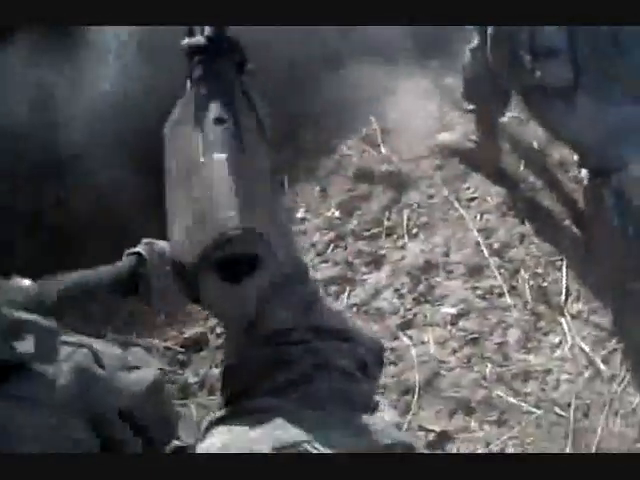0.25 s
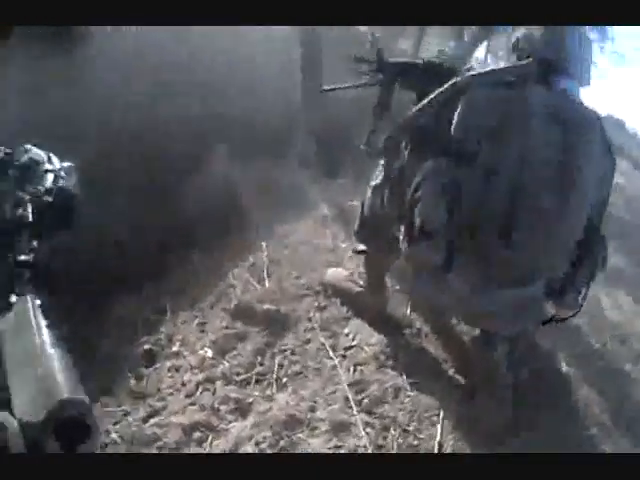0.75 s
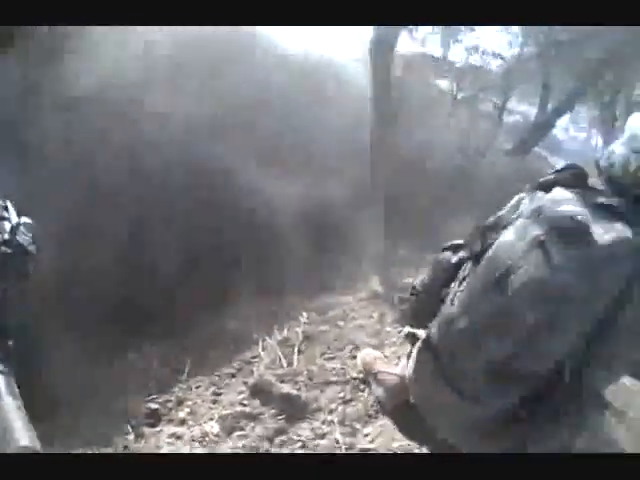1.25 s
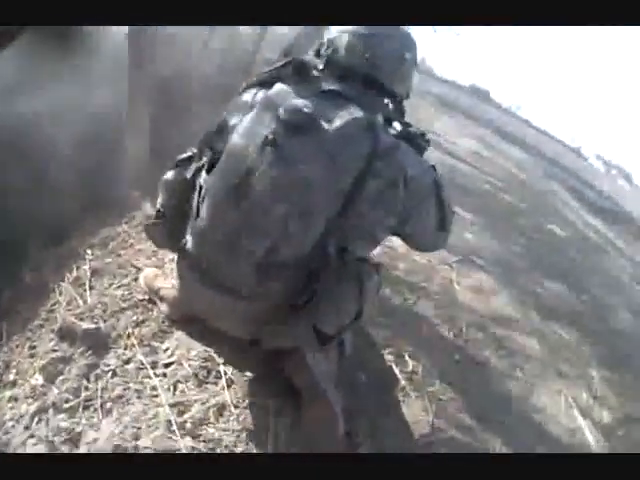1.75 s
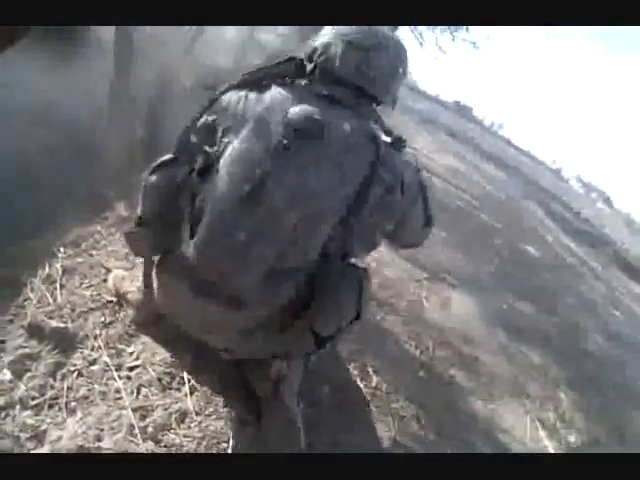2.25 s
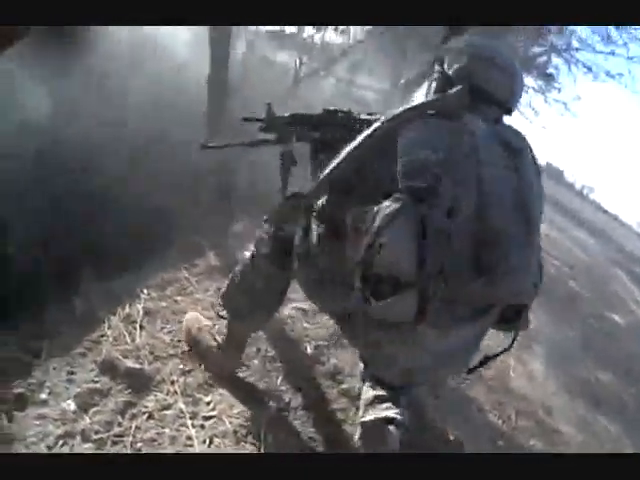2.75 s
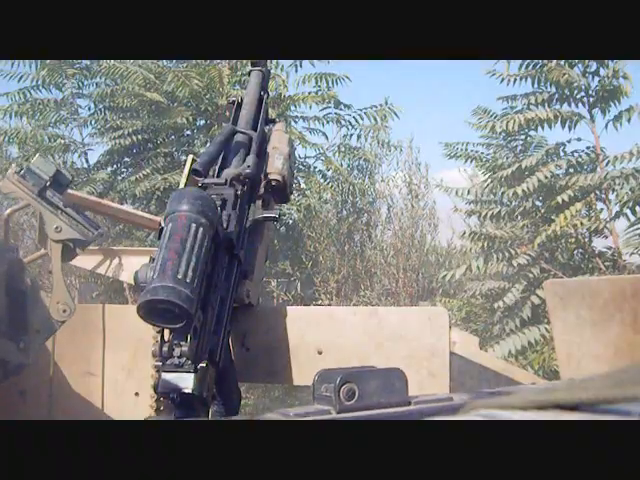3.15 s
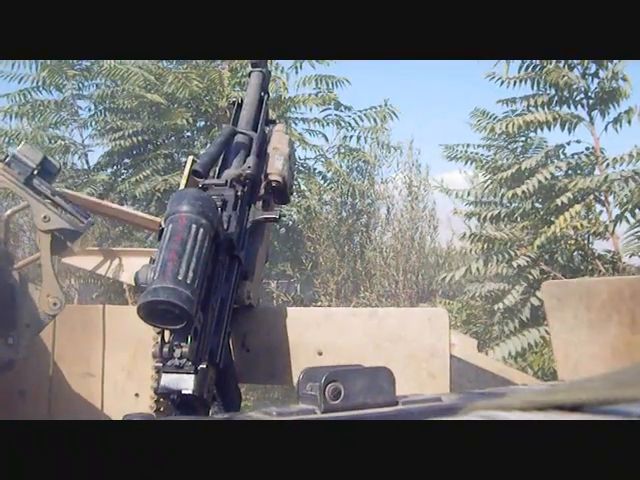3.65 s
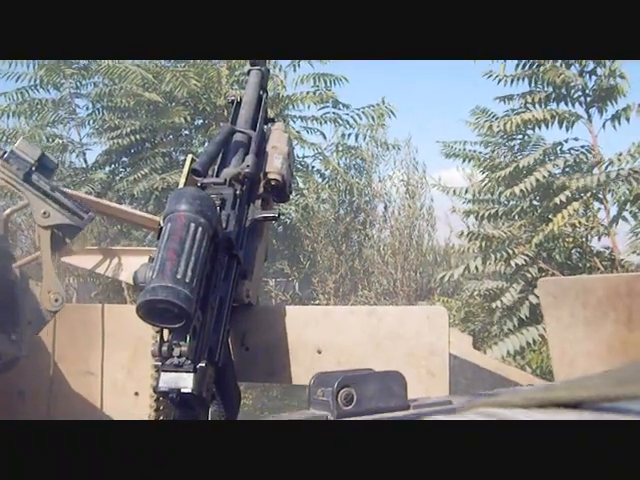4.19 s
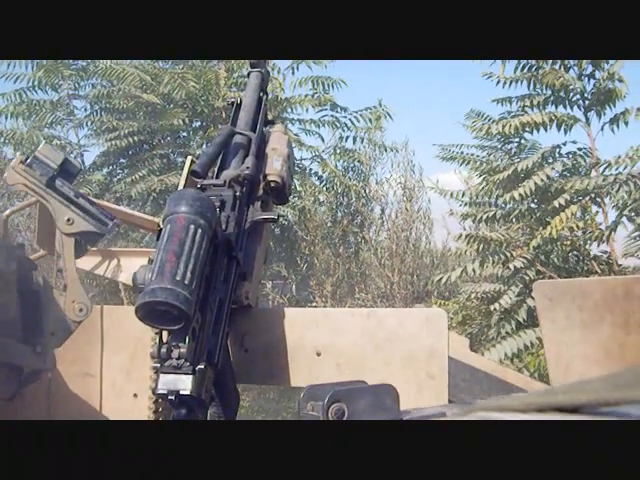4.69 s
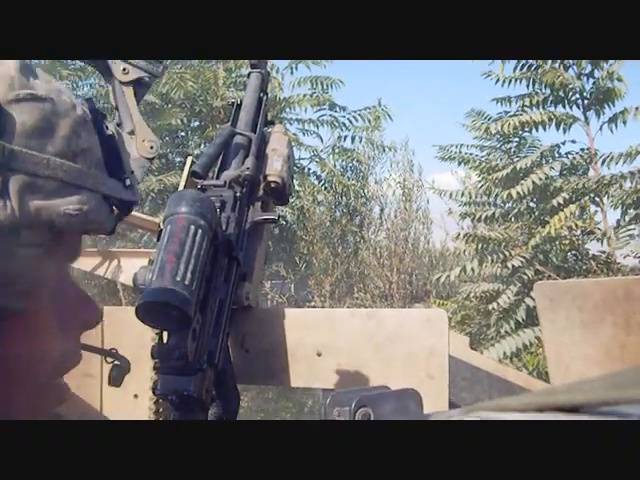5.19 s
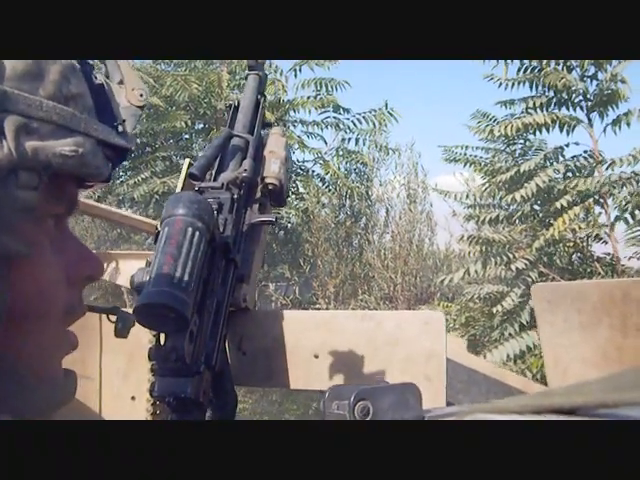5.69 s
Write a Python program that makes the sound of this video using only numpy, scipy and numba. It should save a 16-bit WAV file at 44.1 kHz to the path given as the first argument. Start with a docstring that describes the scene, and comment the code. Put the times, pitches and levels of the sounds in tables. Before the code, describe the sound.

Overloaded gunfire in a field, sharp cracks and a short light machine-gun burst, then ringing rifle shots and a heavy gun's twelve-round string.

```python
"""A light machine gun fires beside a body camera in a field, its blasts and pressure swings driving the
microphone against the rails, amid rifle cracks made of blast waves and far low knocks. Then, at a
vehicle's turret: single rifle shots that ring the armour and a twelve-round burst of the mounted heavy
gun, made of shaped noise and a sinking roar, heard through a dull, overloaded recorder."""
import sys
import numpy as np
from scipy import signal
from scipy.fft import rfft, irfft
from scipy.io import wavfile
from scipy.ndimage import uniform_filter1d
from numba import njit

SR = 44100
rng = np.random.default_rng(int(sys.argv[2]) if len(sys.argv) > 2 else 0)


def inscribe(sig):
    """Save sig as 16-bit PCM at rate SR to the path in sys.argv[1].

    A 1-D sig is mono; a 2-D sig holds one channel per row.
    Samples are clipped to [-1, 1] before scaling.
    """
    pcm = np.round(np.clip(np.atleast_2d(sig).T, -1, 1) * 32767)
    wavfile.write(sys.argv[1], SR, pcm.astype(np.int16))


N = 261513
T = np.arange(int(1.5 * SR)) / SR  # time axis of one sound [s]
FIELD_END_S = 2.91
FIELD_TOP_HZ, TURRET_TOP_HZ, TOP_HZ = 8500, 3930, 15700

# light gun and rifle blast spectrum: (frequency [Hz], relative density [dB])
LIGHT_BLAST_SPECTRUM = [(60, -18), (250, 1.5), (600, -2), (1200, -4.5), (2500, -7), (4200, -2), (6000, 1),
                        (8000, -4.5), (15000, -14.5)]
# field echo spectrum: (frequency [Hz], relative density [dB])
FIELD_ECHO_SPECTRUM = [(60, 20.5), (220, -7.5), (500, 1), (1200, 1), (2500, -3), (4200, 3), (6000, -6.5),
                       (8000, -17), (15000, -33)]
# heavy gun blast spectrum: (frequency [Hz], relative density [dB])
HEAVY_BLAST_SPECTRUM = [(30, -24.5), (120, 4.5), (300, 5.5), (550, 1.5), (900, 9.5), (1700, 10),
                        (2600, 8.5), (4000, 4.5)]
# heavy gun spectrum as the trees return it: (frequency [Hz], relative density [dB])
HEAVY_ECHO_SPECTRUM = [(30, -9), (130, -3.5), (300, -1), (550, -0.5), (1000, -6), (1900, -8.5),
                       (3000, -7.5), (4000, -16.5)]
# scattered sound around the turret: (frequency [Hz], relative density [dB])
TURRET_SCATTER_SPECTRUM = [(30, -13.5), (130, 2), (300, 2), (480, -0.5), (750, 1), (1100, -4.5),
                           (1900, -5.5), (3000, -9), (4000, -13)]


def light_gun():
    """Rounds at a steady cycle; the pressure swings down and up by turns."""
    # bursts: (start [s], rounds, relative blast level [dB], relative first boom level [dB])
    bursts = [(.821, 1, 6, 1), (1.872, 4, 6.5, -15.5)]
    cycle_s, swing_drive, boom_step_db = .079, 0.88, -5.5
    opening_decay_s, following_decay_s = 0.052, 0.033
    out = np.zeros(N)
    for start_s, rounds, blast_db, first_boom_db in bursts:
        for k in range(round(rounds)):
            decay_s = following_decay_s if k else opening_decay_s
            lean = -swing_drive * (-1) ** k
            boom_db = first_boom_db + k * boom_step_db
            add(out, start_s + k * cycle_s, light_round(blast_db, decay_s, boom_db, lean))
    return out


def light_round(blast_db, decay_s, boom_db, lean):
    """A dense blast with a low body, a rolling boom, an echo from the trees and a slow pressure swing."""
    # low body of the muzzle blast: (frequency [Hz], relative density [dB])
    body_spectrum = [(60, 3.5), (180, -1.5), (300, 0), (550, -5), (900, -5.5), (2000, -27), (5000, -49.5)]
    # ground boom: (frequency [Hz], relative density [dB])
    boom_spectrum = [(25, -7.5), (45, -3.5), (90, -3), (190, -9.5), (300, -20), (600, -31.5), (2000, -56)]
    blast = amp(blast_db) * onset(0.0014) * decay(decay_s) * noise(LIGHT_BLAST_SPECTRUM)
    body = amp(blast_db - 9) * onset(0.023) * decay(0.042) * noise(body_spectrum)

    # uneven ground returns the boom and the echo in lumps
    roll = lumps(rate_hz=28)
    boom_fall = decay(.11) + amp(-25) * decay(.45)
    boom = amp(boom_db + 3 * roll) * onset(.03) * boom_fall * noise(boom_spectrum)
    # the stronger the boom, the more the tree line sends back
    echo_db = -17 + 0.53 * boom_db + 4.9 * roll
    echo = amp(echo_db) * onset(.03) * decay(0.22) * noise(FIELD_ECHO_SPECTRUM)

    # the swing leans the microphone against one rail, which chokes the blast, then drifts back slowly
    u = T / 0.031
    push = 1.85 * u ** 2 * np.exp(-u)
    drift_back = .2 * onset(.1) ** 2 * decay(.25)
    return blast + body + boom + echo + lean * (push - drift_back)


def heavy_gun():
    """A string of rounds, each slightly weaker, each closed by a thump and the bolt's clatter."""
    start_s, first_cycle_s, cycle_s, rounds = 3.692, .125, .1132, 12
    first_db, step_db = 2.8, -0.1221  # first round, change per round
    thump_s, thump_db, thump_hz, bolt_s = .093, -12, 125.2, .088  # times after each round
    thump_scatter_s, thump_scatter_db = .002, -1
    out = np.zeros(N)
    for k, (late, strong) in enumerate(rng.standard_normal((rounds, 2))):
        s = start_s
        if k:
            s += first_cycle_s + (k - 1) * cycle_s
        closing = thump(thump_hz, delay_s=thump_s + thump_scatter_s * late)
        closing *= amp(thump_db + thump_scatter_db * strong)
        add(out, s, amp(first_db + k * step_db) * heavy_round() + closing)
        clatter = amp(-19.0) * decay(0.033) * dull_noise(HEAVY_BLAST_SPECTRUM)
        add(out, s + bolt_s, clatter)
    return out


def heavy_round():
    """A bright blast, a roar of band-passed noise that sinks in pitch, and the echo of the trees."""
    blast_fall = amp(-7.0) * decay(0.0032) + amp(-13.5) * np.exp(-(T / 0.064) ** 2)
    blast = onset(0.004) * blast_fall * dull_noise(HEAVY_BLAST_SPECTRUM)

    roar_hz = 70 + 5000 * decay(.0225)
    roar_swell = np.exp(-((T - .060) / .028) ** 2)
    roar = moving_band(rng.standard_normal(len(T)), roar_hz, 1.4)
    roar = moving_band(roar, roar_hz, 1.4)
    roar *= np.sqrt(SR / np.pi / roar_hz)  # offsets the power lost as the band narrows

    echo = amp(-12.5) * onset(0.039) * decay(0.093) * dull_noise(HEAVY_ECHO_SPECTRUM)
    return blast + amp(-16) * roar * roar_swell + echo


def field_rifle_fire():
    """Lone cracks, and full shots: a pulse with a low knock, then a strong reflection and longer spray."""
    # cracks: (time [s], relative pulse level [dB], pulse length [ms])
    cracks = [(.073, -23, 0.59), (.2378, -9, 0.73), (0.2638, -0.5, .16), (0.2688, -7.5, 0.56),
              (.373, -15.5, .75), (.595, -27.5, 1.1), (.664, -15, .85), (0.708, -17.5, .77),
              (.785, -11.5, 0.38), (.992, 3.5, 1.6)]
    # full shots: (time [s], relative pulse level [dB], relative scatter level [dB])
    shots = [(0.2889, -4.5, -25), (1.259, 6, -19.5)]
    crack_spray_db, crack_spray_s = -24.5, .0032  # level relative to the pulse
    shot_ms, knock_db, shot_spray_s = 2.3, -19, 0.019
    bounce_s, bounce_db = 0.0091, -7
    out = np.zeros(N)
    for s, pulse_db, ms in cracks:
        add(out, s, field_report(pulse_db, ms, pulse_db + crack_spray_db, crack_spray_s))
    for s, pulse_db, scatter_db in shots:
        direct = field_report(pulse_db, shot_ms, scatter_db, crack_spray_s)
        bounce = field_report(pulse_db + bounce_db, shot_ms, scatter_db, shot_spray_s)
        add(out, s, knock(pulse_db + knock_db) - direct)
        add(out, s + bounce_s, bounce)
    return out


def field_report(pulse_db, ms, scatter_db, spray_s):
    """A sharp pulse that rings the camera's case, with a short spray of reflections."""
    pulse = report(pulse_db, ms, ground_db=-12, ground_s=.0021)
    pulse = butter(pulse, min(1300 / ms, SR / 3), "low")  # longer pulses have rounder fronts
    case = amp(-5.5) * ring(pulse, hz=840, width=0.66)
    case += amp(-9.5) * ring(pulse, hz=244, width=.3) * min(ms / 2, 1)
    spray = decay(spray_s) * noise(LIGHT_BLAST_SPECTRUM)
    spray += amp(-18.5) * decay(0.081) * noise(FIELD_ECHO_SPECTRUM)
    return amp(-3.5) * pulse + case + amp(scatter_db) * spray


def turret_rifle_fire():
    """Cracks ring the armour plates, with close reflections, two dull slaps and the echo of the trees."""
    # cracks: (time [s], relative pulse level [dB], pulse length [ms])
    cracks = [(2.929, 6, 0.18), (3.1266, 7, .16), (3.361, 6, 0.42), (3.508, -3, 0.2), (5.151, -2, 1),
              (5.505, 8.5, 0.43), (5.805, -6.5, 1)]
    close_db, close_decay_s = -20.5, 0.013  # level relative to the pulse
    out = np.zeros(N)
    for s, pulse_db, ms in cracks:
        pulse = report(pulse_db, ms, ground_db=-10.0, ground_s=.004)
        low_plate, high_plate = plates(pulse)
        armour = amp(4) * low_plate + amp(-13) * high_plate
        close = amp(pulse_db + close_db) * decay(close_decay_s) * dull_noise(TURRET_SCATTER_SPECTRUM)
        trees = onset(0.013) * decay(0.079) * dull_noise(TURRET_SCATTER_SPECTRUM)
        trees *= amp(-27 + 0.44 * pulse_db)
        add(out, s, amp(-3) * pulse + armour + close + trees)
        for lag_s in (.030, .055):
            slap = np.sin(2 * np.pi * 450 * T) + amp(-5.5) * dull_noise(HEAVY_ECHO_SPECTRUM)
            add(out, s + lag_s, amp(pulse_db - 21) * decay(0.0038) * slap)
    return out


def plates(pulse):
    """The two resonances of the turret's armour."""
    return ring(pulse, hz=560, width=.2), ring(pulse, hz=950, width=.25)


def report(pulse_db, ms, ground_db, ground_s):
    """A shot's pressure pulse with its softer, longer bounce off the ground."""
    return amp(pulse_db) * (blast_wave(ms) + amp(ground_db) * blast_wave(1.6 * ms, ground_s))


def blast_wave(ms, delay_s=0):
    """A shock front, falling pressure, then suction of equal area."""
    u = np.maximum(T - delay_s, 0) * 1000 / ms
    return (u > 0) * (1 - u) * np.exp(-u)


def blasts(colour):
    """Short dense muzzle blasts: noise that starts almost at once and dies away."""
    # blasts: (time [s], relative level [dB], decay [s])
    events = [(1.1433, -14, 0.017), (3.507, -7.5, 0.056), (5.149, -8, 0.0084), (5.489, -10, 0.077)]
    envelope = np.zeros(N)
    for s, db, decay_s in events:
        add(envelope, s, amp(db) * onset(0.0014) * decay(decay_s))
    return colour * envelope


def thumps():
    """Single low dips of pressure."""
    # thumps: (time [s], relative level [dB], pitch [Hz])
    events = [(1.21, -4, 62), (3.3633, -2, 183), (3.542, -7, 158), (5.1542, -6, 253), (5.536, -13.5, 148)]
    out = np.zeros(N)
    for s, db, hz in events:
        lead_s = 2 / hz
        add(out, s - lead_s, -amp(db) * thump(hz, delay_s=lead_s))
    return out


def thump(hz, delay_s):
    """One smooth low push of pressure with a dip on either side."""
    cycles = hz * (T - delay_s)
    return np.cos(2 * np.pi * cycles) * np.exp(-(cycles / .72) ** 2)


def small_knocks():
    """Small short knocks, perhaps faint shots; each rings at two pitches, the upper 1.3 times the lower."""
    # knocks: (time [s], relative level [dB], lower pitch [Hz])
    events = [(5.594, -14.5, 950), (5.642, -13, 660), (5.668, -15.5, 814), (5.727, -14, 1280),
              (5.834, -15, 740)]
    out = np.zeros(N)
    for s, db, hz in events:
        tones = np.sin(2 * np.pi * hz * T) + amp(-2) * np.sin(2 * np.pi * 1.3 * hz * T)
        tick = amp(-17) * decay(0.0016) * rng.standard_normal(len(T))
        add(out, s, amp(db) * (tones * decay(0.0028) + tick))
    return out


def far_gun():
    """Bursts further off; distance leaves only a low knock of each round."""
    # bursts: (start [s], rounds, relative level [dB])
    bursts = [(1.504, 1, -43), (2.370, 4, -33.5)]
    cycle_s = .078
    out = np.zeros(N)
    for start_s, rounds, db in bursts:
        for k in range(round(rounds)):
            add(out, start_s + k * cycle_s, knock(db))
    return out


def knock(db):
    """The soft, dull low part of a shot: two tones and low noise."""
    # what distance leaves of a shot: (frequency [Hz], relative density [dB])
    far_spectrum = [(90, -14), (200, 10), (400, 3.5), (600, -12.5), (1500, -14), (4000, -24)]
    tone = np.sin(2 * np.pi * 205 * T) + amp(-8.5) * np.sin(2 * np.pi * 335 * T)
    tone += amp(-0.5) * noise(far_spectrum)
    return amp(db) * 2 * onset(.004) * decay(.013) * tone


def hisses(colour):
    """Brief noise that swells quickly and fades more slowly."""
    # hisses: (crest time [s], relative level [dB], fall time [s])
    events = [(.775, -43, 0.16), (1.255, -32, 0.099), (1.849, -36.5, .04), (2.315, -30, 0.052),
              (3.339, -20.5, .028)]
    t = np.arange(N) / SR
    envelope = np.zeros(N)
    for s, db, fall_s in events:
        width_s = np.where(t < s, .45 * fall_s, fall_s)
        envelope += amp(db) * np.exp(-((t - s) / width_s) ** 2)
    return colour * envelope


def field(low):
    """The body camera clips hard; only the clipped edges reach above its band."""
    # background air: (frequency [Hz], relative density [dB])
    air_spectrum = [(30, 5), (100, -0.5), (250, -8.5), (500, -11.5), (1400, -14.5), (3000, -19.5),
                    (5000, -18), (7500, -20), (9000, -36)]
    # slow air pressure on the camera, below hearing: (frequency [Hz], relative density [dB])
    drift_spectrum = [(1, 0), (3, -16), (8, -46), (30, -85), (100, -120)]
    air = amp(-51.0) * noise(air_spectrum, size=N)
    drift = amp(-25.5) * noise(drift_spectrum, size=N)
    hiss = hisses(noise(LIGHT_BLAST_SPECTRUM, size=N))
    shots = light_gun() + field_rifle_fire() + far_gun()
    shots += blasts(noise(LIGHT_BLAST_SPECTRUM, size=N))
    clipped = overload(shots + low + hiss + air + drift)
    edges = butter(clipped - np.tanh(clipped), FIELD_TOP_HZ, "high", order=4)
    return amp(1.0) * band_limit(clipped, FIELD_TOP_HZ) + amp(-1.5) * edges


def turret(low):
    """The turret's recorder squashes the blasts and keeps a telephone-like band."""
    # background air: (frequency [Hz], relative density [dB])
    air_spectrum = [(30, 3.5), (110, 6), (220, 3), (500, 0.5), (900, 1), (1500, 2.5), (2600, -7),
                    (4000, -15.5)]
    rail = .85
    air = amp(-37.0) * dull_noise(air_spectrum, size=N)
    hiss = hisses(dull_noise(TURRET_SCATTER_SPECTRUM, size=N))
    shots = heavy_gun() + turret_rifle_fire()
    shots += blasts(dull_noise(TURRET_SCATTER_SPECTRUM, size=N))
    sound = butter(shots + small_knocks() + low + hiss + air, 50, "high")
    return band_limit(rail * overload(sound / rail), TURRET_TOP_HZ)


def overload(x):
    """A microphone that rounds off into its rails at +-1."""
    return x / (1 + x ** 6) ** (1 / 6)


def amp(db):
    """Decibels to gain."""
    return 10 ** (np.asarray(db) / 20)


def onset(rise_s):
    """Exponential rise from 0 towards 1."""
    return 1 - np.exp(-T / rise_s)


def decay(fall_s):
    """Exponential fall from 1."""
    return np.exp(-T / fall_s)


def add(track, s, sound):
    """Mix a sound into a track at time s."""
    i = int(s * SR)
    track[i:i + len(sound)] += sound[:len(track) - i]


def noise(spectrum, size=len(T)):
    """Noise of rms 1 shaped by a spectrum, falling off below its first frequency."""
    hz, db = np.transpose(spectrum)
    f = np.fft.rfftfreq(size, 1 / SR) + 1e-9  # keeps log(0) out
    gain = amp(np.interp(np.log(f), np.log(hz), db)) * np.minimum(f / hz[0], 1)
    x = irfft(rfft(rng.standard_normal(size)) * gain, size)
    return x / x.std()


def dull_noise(spectrum, size=len(T)):
    """Coloured noise of rms 1 inside the turret recorder's band."""
    x = band_limit(noise(spectrum, size), TURRET_TOP_HZ)
    return x / x.std()


def lumps(rate_hz):
    """Slow random curve of spread near 1: random values joined by ramps."""
    hold = int(SR / rate_hz)
    steps = np.repeat(rng.standard_normal(len(T) // hold + 1), hold)
    return 1.2 * uniform_filter1d(steps, hold)[:len(T)]


def butter(x, hz, kind, order=2):
    """Gentle low-pass or high-pass."""
    return signal.sosfilt(signal.butter(order, hz, kind, fs=SR, output="sos"), x)


def band_limit(x, hz):
    """Steep low-pass."""
    return signal.sosfilt(signal.ellip(12, .2, 85, hz, fs=SR, output="sos"), x)


@njit
def moving_band(x, hz, width):
    """State-variable band-pass with a moving centre; width is a share of the centre."""
    y, band, low = np.empty(len(x)), 0., 0.
    for i in range(len(x)):
        g = np.tan(np.pi * hz[i] / SR)
        v = (band + g * (x[i] - low)) / (1 + g * (g + width))
        band, low, y[i] = 2 * v - band, low + 2 * g * v, width * v
    return y


def ring(x, hz, width):
    """A fixed resonance; width is a share of its centre."""
    return moving_band(x, np.full(len(x), float(hz)), float(width))


def scene():
    """First the field, then the turret."""
    low = thumps()
    in_field = np.arange(N) / SR < FIELD_END_S
    return np.where(in_field, field(low), turret(low))[None]


def record(dry):
    """The top is cut."""
    return band_limit(dry, TOP_HZ)


dry = scene()
out = record(dry)
inscribe(out)
```